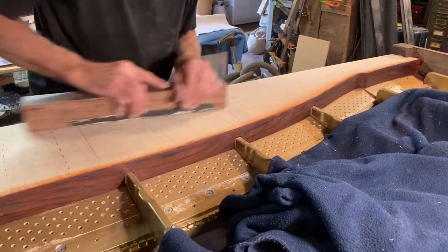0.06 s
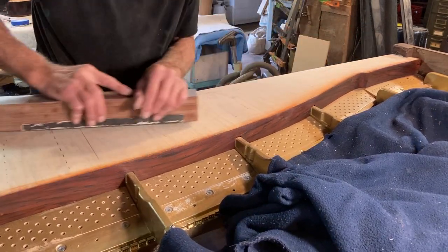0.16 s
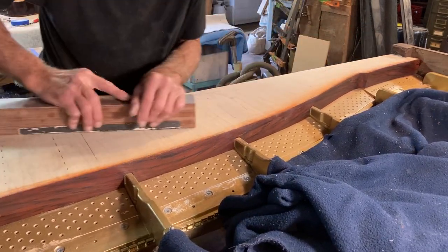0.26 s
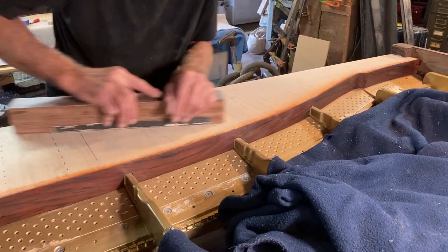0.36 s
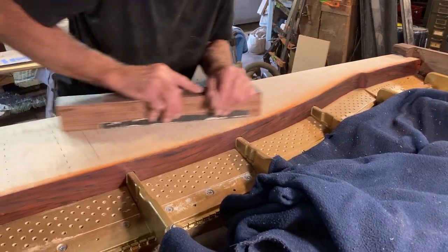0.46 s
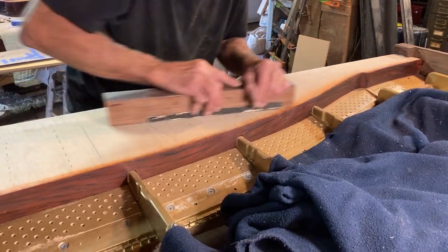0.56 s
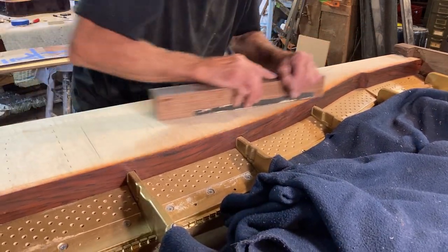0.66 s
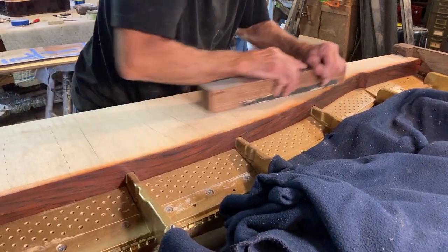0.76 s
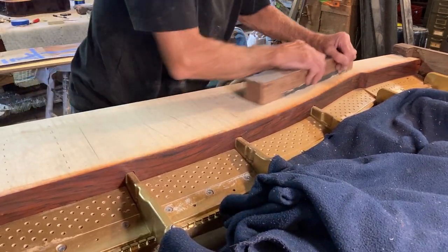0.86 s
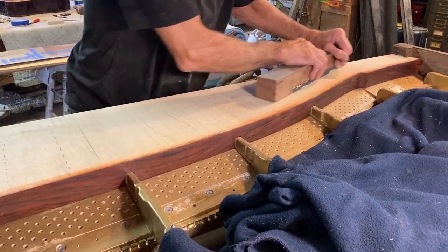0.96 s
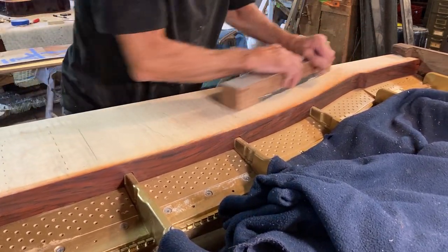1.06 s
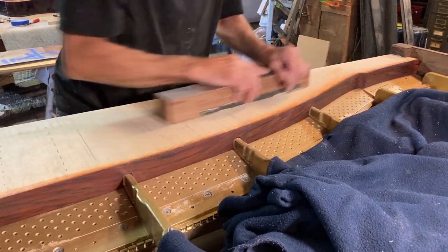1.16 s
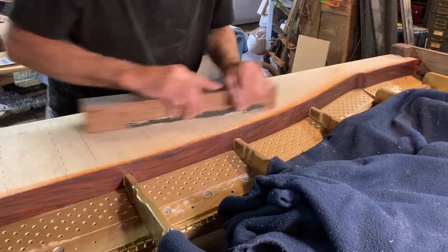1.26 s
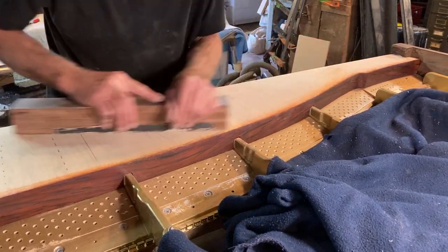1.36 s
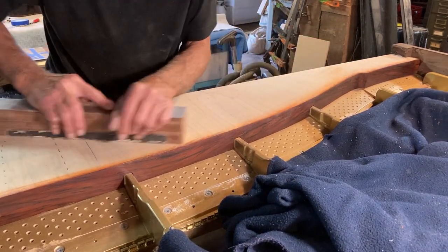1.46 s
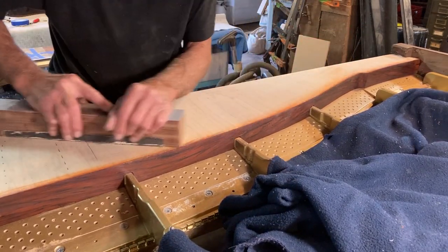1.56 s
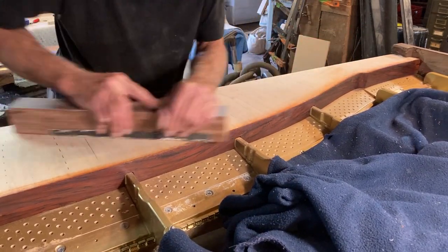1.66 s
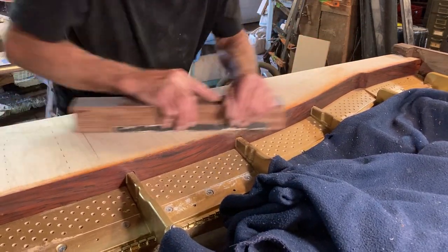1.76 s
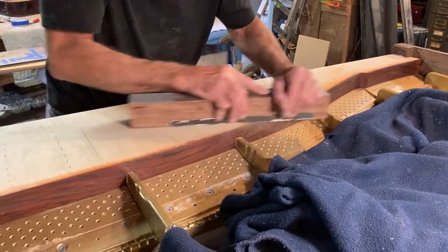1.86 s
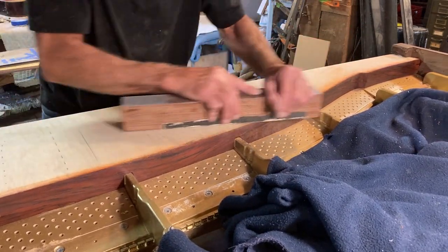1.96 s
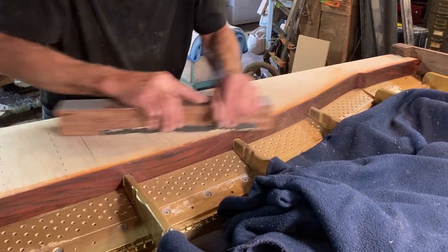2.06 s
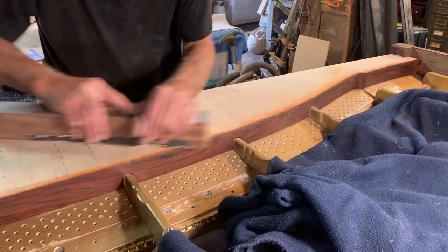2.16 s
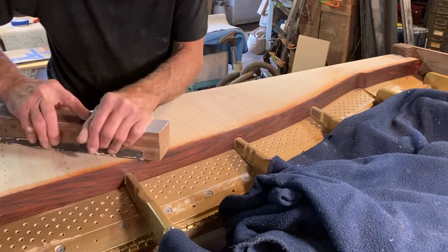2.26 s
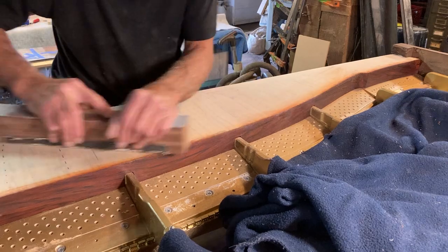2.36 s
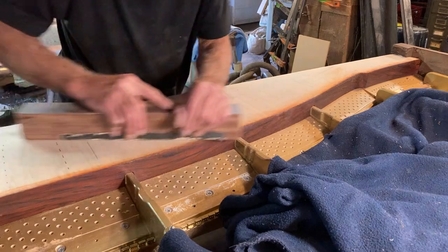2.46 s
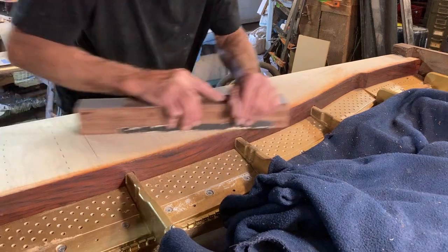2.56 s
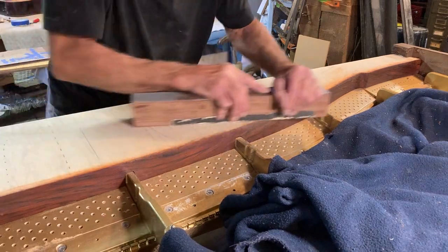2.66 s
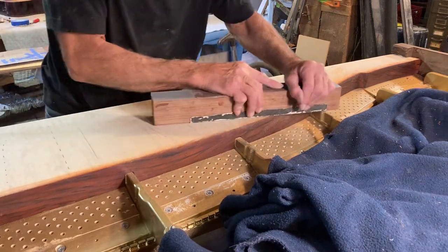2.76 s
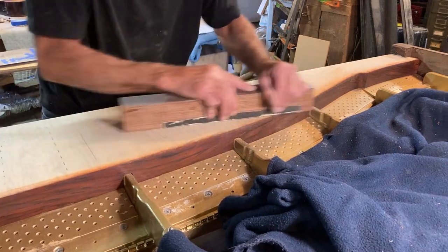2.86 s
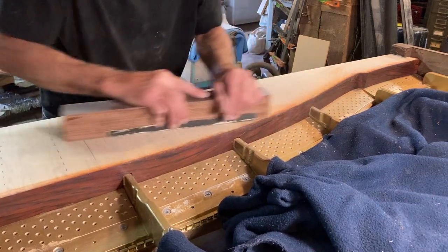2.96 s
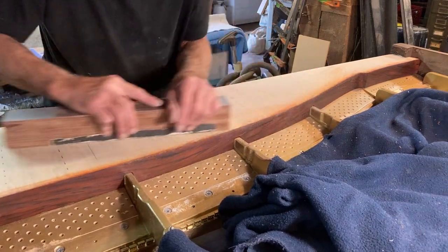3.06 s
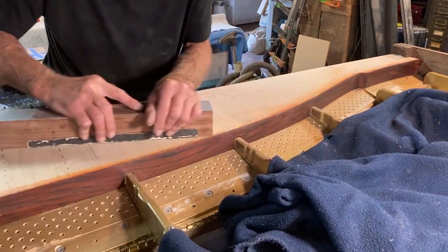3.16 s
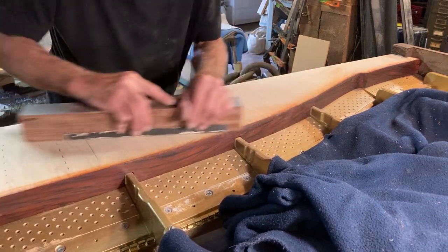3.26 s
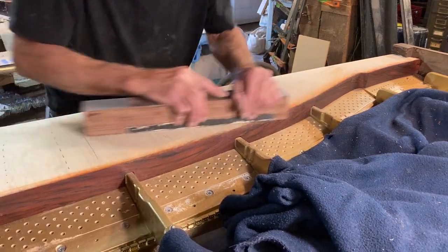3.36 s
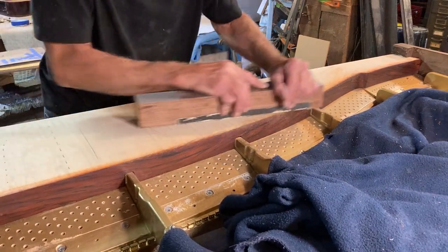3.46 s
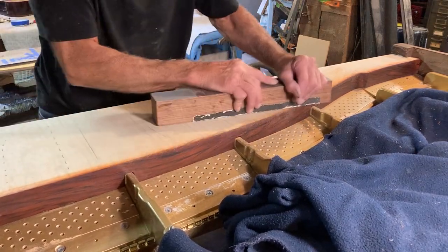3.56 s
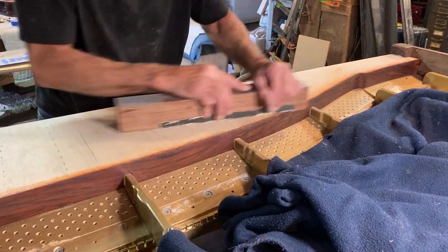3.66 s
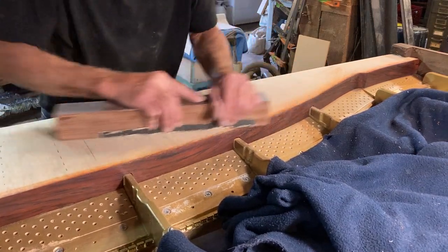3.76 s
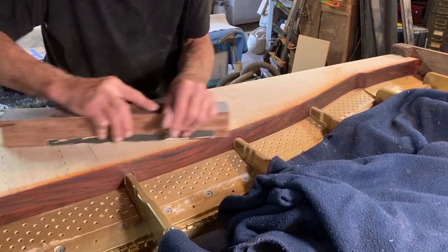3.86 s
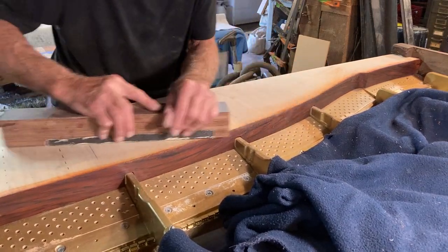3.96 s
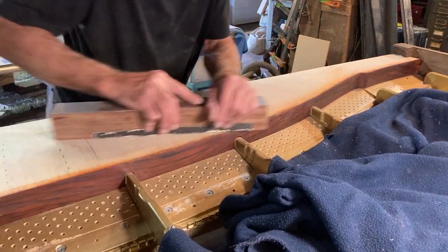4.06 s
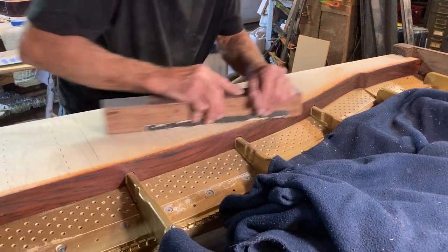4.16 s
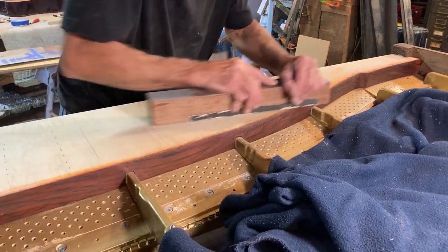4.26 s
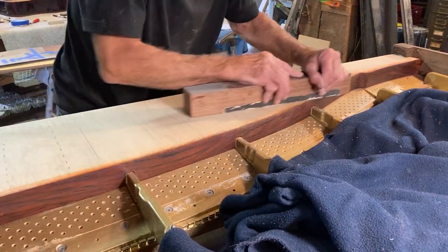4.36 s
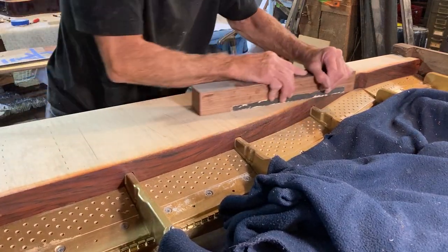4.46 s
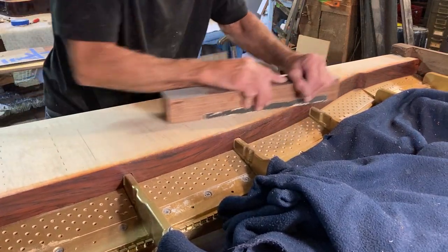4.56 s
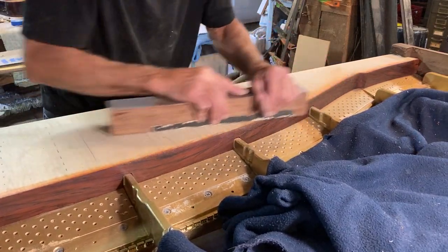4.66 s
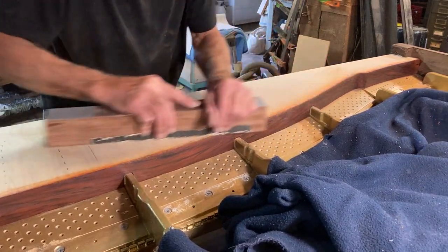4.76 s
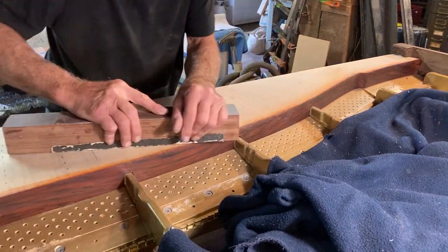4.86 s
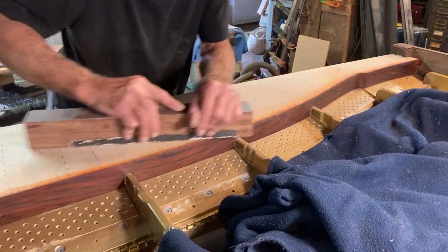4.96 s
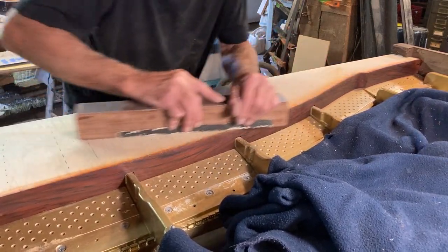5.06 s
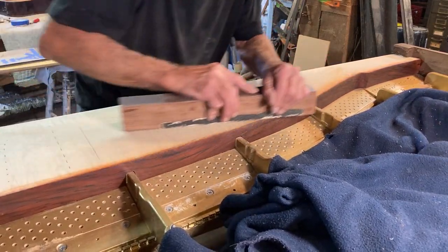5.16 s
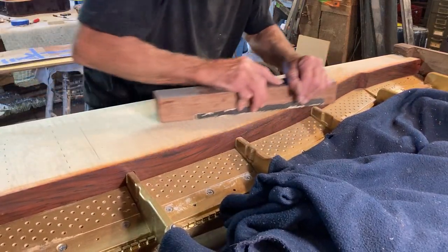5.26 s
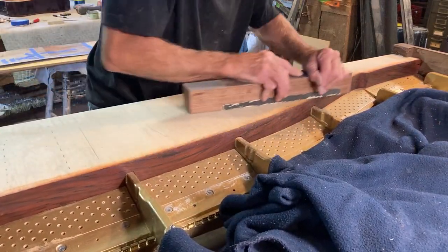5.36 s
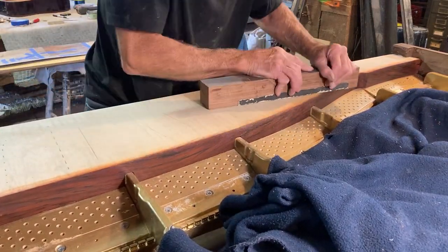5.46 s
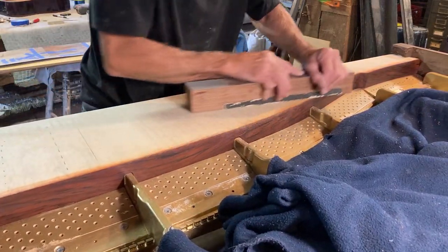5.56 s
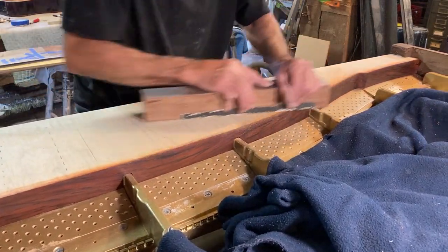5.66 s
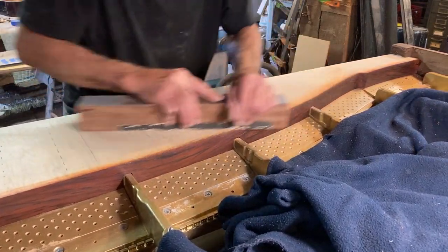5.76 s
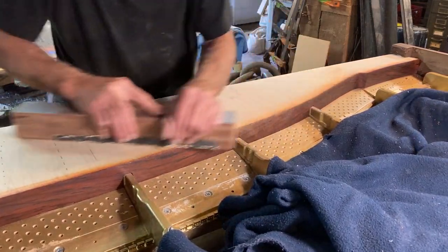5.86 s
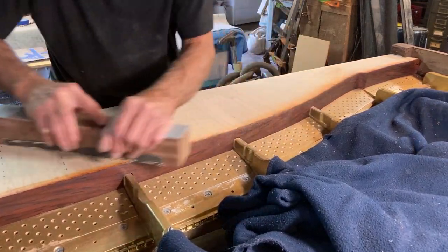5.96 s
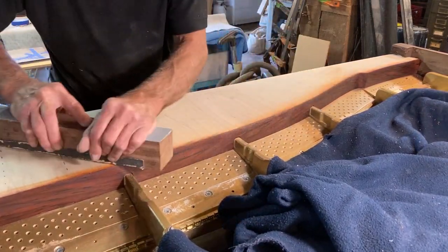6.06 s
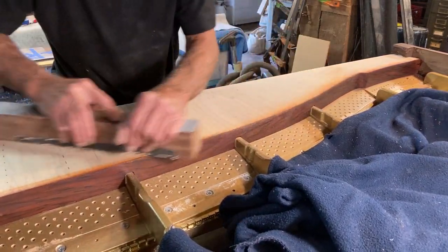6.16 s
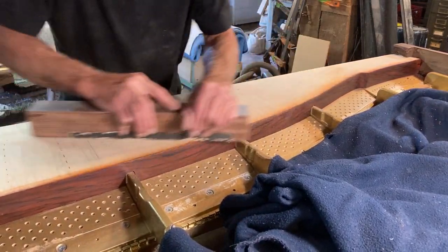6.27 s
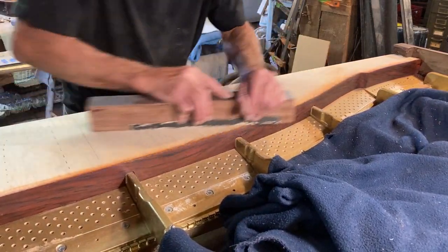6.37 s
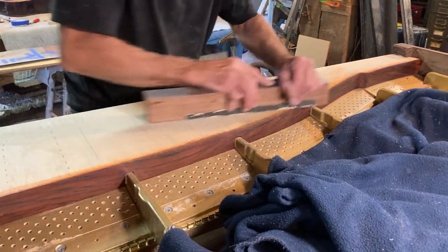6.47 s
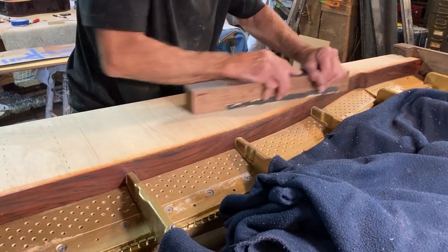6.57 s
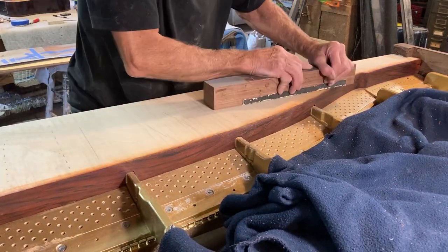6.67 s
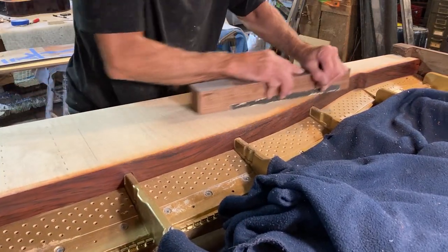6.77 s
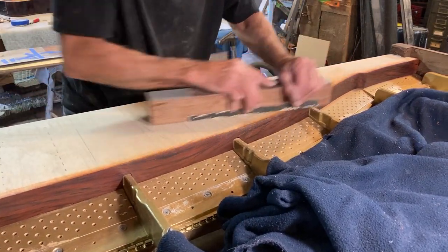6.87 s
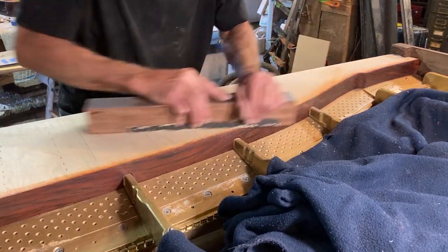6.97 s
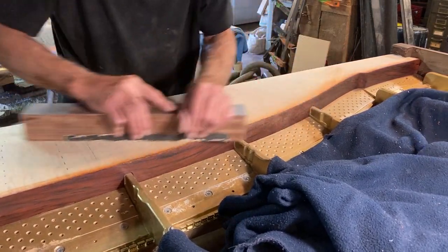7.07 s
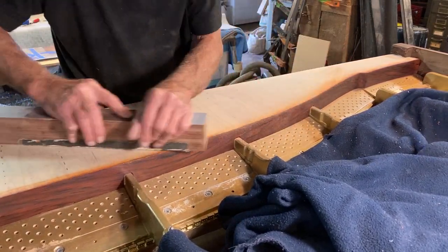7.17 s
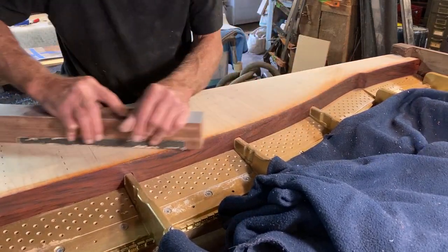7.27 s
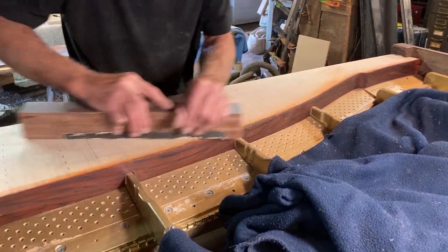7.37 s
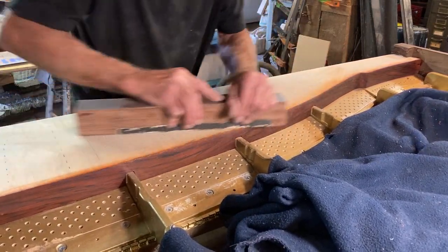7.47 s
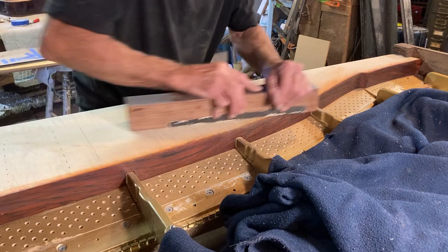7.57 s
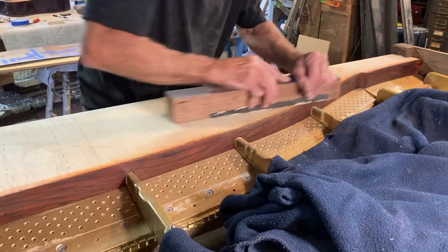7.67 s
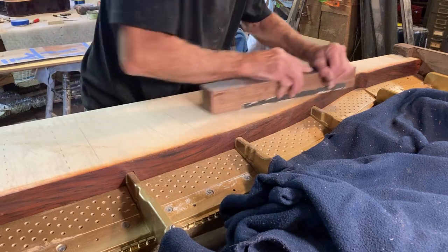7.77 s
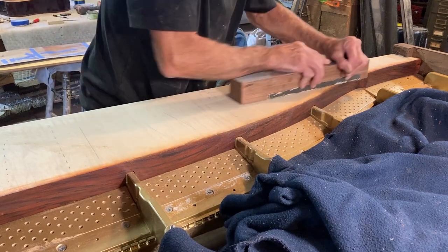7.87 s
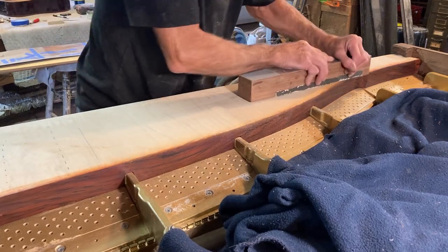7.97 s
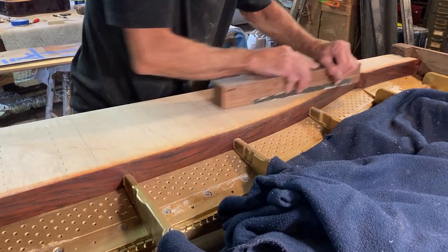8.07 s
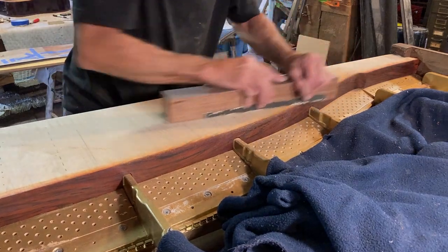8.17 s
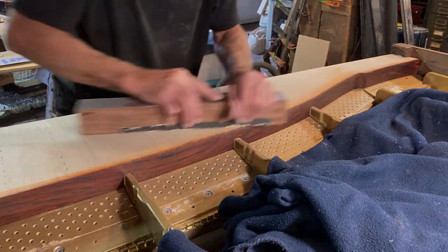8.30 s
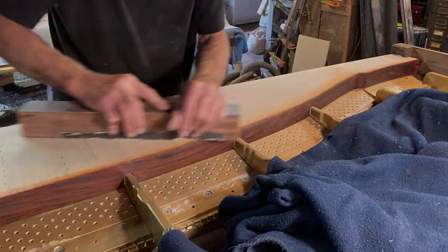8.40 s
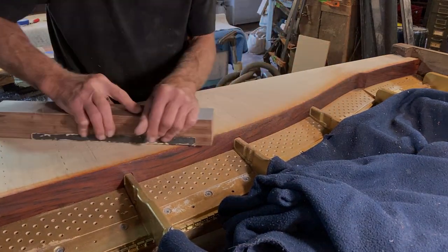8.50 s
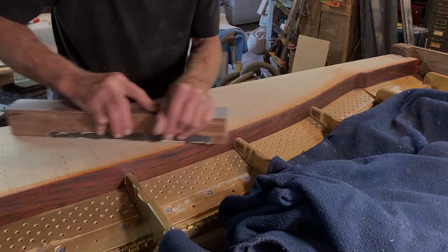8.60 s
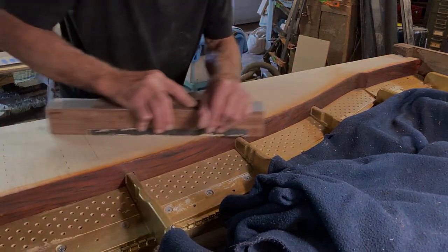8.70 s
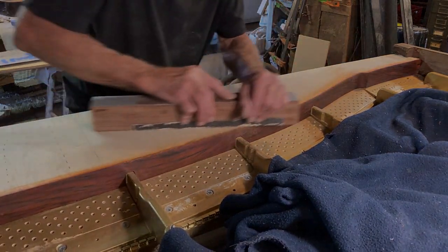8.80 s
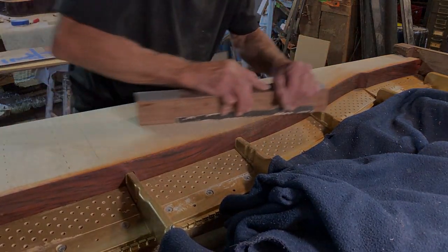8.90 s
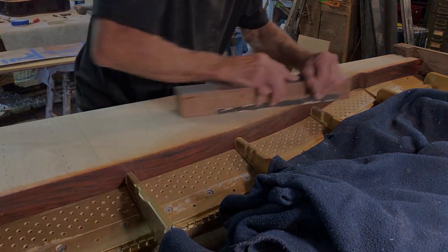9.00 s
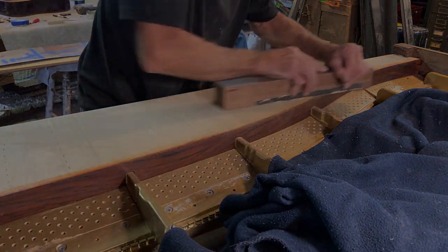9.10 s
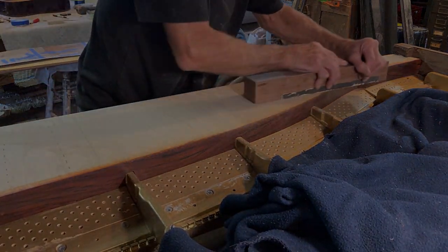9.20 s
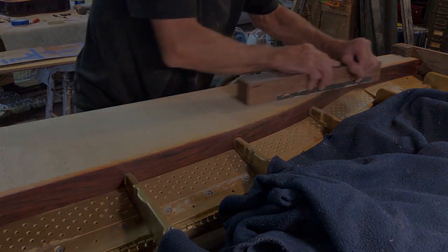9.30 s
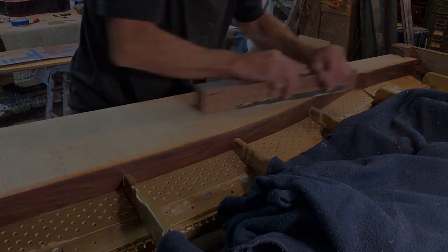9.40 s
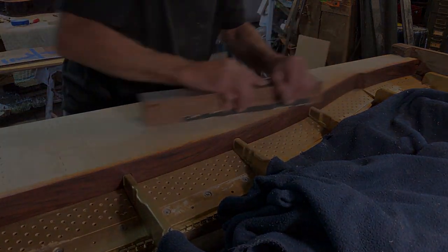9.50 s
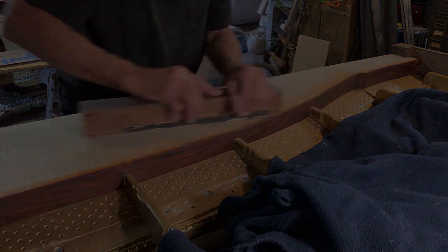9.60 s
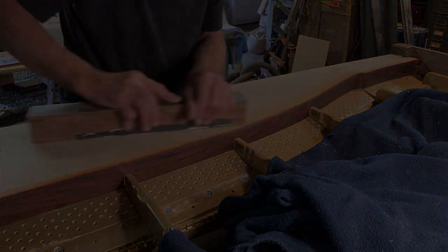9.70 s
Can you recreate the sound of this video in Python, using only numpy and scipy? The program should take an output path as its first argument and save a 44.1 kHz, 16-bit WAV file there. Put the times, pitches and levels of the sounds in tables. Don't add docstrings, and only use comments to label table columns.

```python
import sys
import numpy as np
from scipy import signal
from scipy.fft import rfft, irfft, next_fast_len
from scipy.io import wavfile
from scipy.ndimage import uniform_filter1d, map_coordinates

SR = 44100
rng = np.random.default_rng(int(sys.argv[2]) if len(sys.argv) > 2 else 0)


def pcm_store(signal):
    levels = np.round(np.clip(np.atleast_2d(signal), -1, 1) * 32767)
    wavfile.write(sys.argv[1], SR, levels.astype(np.int16).T)


def convert_level_to_amplitude(level_db):
    exponent = np.asarray(level_db, float) / 20
    return 10 ** exponent


N = 429534
FRAME = 512

# start_s, place_rad (leftward, as port phase), rasp_db, drift_db (per stroke), weight_db
STROKES = [(-.4, -4, -26.5, 6, -5), (0.114, 3.5, -80, 2, -27), (0.224, 5, -28, 3.5, 2.5),
           (.942, -1, -23, -1, 0.5), (1.527, 5.5, -27.5, 1, .1), (1.928, 2, -24, 2, -4.5),
           (2.329, 5.5, -28, -3.5, -1.5), (2.791, 0.5, -26, 3, -4), (3.188, 5, -28, -3.5, -1.5),
           (3.582, 1.2, -25, 1.5, -2.5), (3.953, 5, -29, -3, .1), (4.475, -.5, -24.5, 0, -3.5),
           (4.92, 4, -31.5, -7, 2), (5.514, 0.3, -23, -1.5, 1), (6.102, 5, -26.5, -6, 0),
           (6.712, -0.06, -24, 0, -0.5), (7.258, 5, -29, -5.5, 0.5), (7.985, -0.4, -24.5, -2.5, -1),
           (8.54, 4, -31, 2.5, -0.5), (9.276, -1.5, -29.5, -18, 1.5), (9.95, 6, -26, 0, 0)]
# turn_s, rasp_db, halt_s (before the turn)
ODD_TURNS = [(.112, -60, 0), (.222, -76, 0), (.942, -51, 0.001), (2.331, -49, 0.0047), (2.793, -58, 0.0068),
             (4.475, -62, 0.0037), (6.1, -67, 0.016), (6.714, -61, 0.011), (8.54, -45, 0.0014),
             (9.264, -61, 0.015)]
# speed_up_s, speed_up_share, slow_down_s, slow_down_share (of stroke), loudness_power (of speed)
PUSH = (0.093, 0.093, 0.067, 0.075, 1.84)
PULL = (0.038, 0.31, 0.037, 0.31, 1.6)
# freq_hz, density_db_per_hz
GRIT = [(300, -42), (600, -18), (900, -18), (1500, -8.5), (2200, -3), (3100, -4.5), (4500, 0), (5800, -1),
        (7300, -2), (10000, -7), (13000, -17), (14800, -21.5), (15800, -31)]
# freq_hz, width_hz, gain_db
DECK = [(674, 22, 9.5), (809, 25, 7.5), (951, 73, 9), (1187, 89, 9), (1410, 30, 2.5)]
# freq_hz, width_hz, level_db
HULL = [(83, 3.4, -11.5), (142.4, 14, -3.5), (157.9, 4.7, -5), (201.4, 8, -6.5), (235.4, 7.5, 1),
        (279, 8.8, -4.5), (303.5, 29, -4), (369.4, 9.1, -7), (415, 22, -7), (453.4, 6, -3),
        (485.7, 20.5, -6), (555, 19, -14.5)]
# level_db, follow_db_per_db (of rasp), push_gain_db, place_db_per_rad,
# growth_db (per stroke), weight_db_per_db, linger_s
SHAKE_RULES = [
    (-43.5, 0.33, 0.5, -1, 4, 0.33, 0.043),
    (-45.5, 0.72, 6.5, .5, 4, 1.45, 0.075),
    (-45.5, 0.62, 5.5, -0.36, 5, 1.3, 0.03),
]
# start_s, thud_db, crack_db, ring_length_share, bass_db_per_octave
KNOCKS = [
    (.205, -17, -50, 0.76, 3),
    (0.272, -31, -50, 0.24, 16.5),
    (2.264, -7, -11, 1, 1),
]
# freq_hz, level_db, t60_s, swell_s
RING = [(86, -19, 0.76, 0.02), (143.4, -3, 0.69, 0.025), (196, -4.5, 0.43, 0.009), (273, 0, 0.59, 0.038),
        (159.4, -1, 0.47, 0.023), (217.4, 0, 0.35, 0.026), (352, 4, 0.29, 0.026), (428, 7, 0.21, 0.0014),
        (508, -1.5, 0.25, .01), (671, -1, 0.14, 0.0037), (773, -2, 0.15, 0.0015),
        (860, -32.5, 0.05, 0.0028), (1136, -9, 0.14, 0.0024), (1340, -27, 0.12, .004)]
# freq_hz, density_db_per_hz
CRACK = [(300, -18), (1000, -8), (2500, -1.5), (4000, 1.5), (5500, -12), (8000, -7), (14000, -29)]
# start_s, end_s, freq_hz, width_hz, level_db
SQUEAK = (0.7, 0.83, 1190, 25, -43)
# freq_hz, density_db_per_hz
SHOP = [(25, -40), (45, -18), (160, 50), (700, -9), (4000, -92), (10000, -88), (16000, -59)]
# freq_hz, lead_rad
STILL = [(100, -.12), (550, -.45), (780, .7), (1300, .1), (3000, 1.4), (3900, .1), (5300, 0), (5900, 1)]
# freq_hz, lead_rad_per_place_rad
SWING = [(600, 0), (1200, .15), (2000, .35), (3000, .4), (3900, 1), (5300, 1), (6000, .8)]
# freq_hz, lead_rad
BEND = [(1500, 0), (2500, .5), (3000, .7), (3400, -.4), (4000, -.7), (5300, -.5)]
# freq_hz, lead_rad
TREBLE = [(5000, 2.8), (7000, 0), (9200, -3.14), (11350, -6.28), (13700, -9.42), (15500, -12.57)]
# freq_hz, coherence_0_to_1
ALIKE = [(100, 0.99), (300, 0.97), (550, 0.49), (750, 0.17), (1500, 0.41), (2200, 0.68), (2900, 0.71),
         (3400, 0.44), (4700, 0.65), (6000, 0.59), (7000, 0.96), (8000, 1), (9200, 1), (10300, 0.69),
         (11350, 0.9), (13700, 1), (14700, 0.87), (15300, .98)]
# freq_hz, difference_db
LEAN = [(300, 0.3), (800, 0.5), (1500, 2.5), (2900, 2.8), (3400, 2.5), (5000, 0), (5800, -2), (7000, 0)]


def unit(x):
    return x / np.sqrt(np.mean(np.abs(x) ** 2) + 1e-20)


def along(points, hz):
    f, v = np.transpose(points)
    return np.interp(np.log(hz + 1), np.log(f + 1), v)


def wobble(rate_hz):
    knots = rng.standard_normal(int(N * rate_hz / SR) + 4)
    return map_coordinates(knots, [np.arange(N) * rate_hz / SR])


def filtered(x, response):
    m = next_fast_len(N + SR // 2)
    return irfft(rfft(x, m) * response(np.fft.rfftfreq(m, 1 / SR)), m)[..., :N]


def hand(t):
    start_s, place_rad, rasp_db, drift_db, weight_db = np.transpose(STROKES)
    turn_db = np.full(len(start_s), -65.5)
    halt_s = np.zeros(len(start_s))
    for when_s, odd_db, odd_halt_s in ODD_TURNS:
        nearest = np.argmin(np.abs(start_s - when_s))
        turn_db[nearest] = odd_db
        halt_s[nearest] = odd_halt_s
    k = np.clip(np.searchsorted(start_s, t) - 1, 0, len(start_s) - 2)
    length_s = start_s[k + 1] - start_s[k]
    since_s = t - start_s[k]
    progress = since_s / length_s
    push = place_rad[k + 1] < place_rad[k]
    up_s, up, down_s, down, power = np.where(push, np.array(PUSH)[:, None], np.array(PULL)[:, None])

    def ramp(x):
        return np.sin(np.pi / 2 * np.clip(x, 0, 1))

    speed_up = ramp(since_s / (up_s + up * length_s))
    slow_down = ramp((length_s - halt_s[k + 1] - since_s) / (down_s + down * length_s))
    speed = speed_up * slow_down
    creep = convert_level_to_amplitude(turn_db[k] + (turn_db[k + 1] - turn_db[k]) * (progress > 0.5))
    level = convert_level_to_amplitude(rasp_db[k] + drift_db[k] * (progress - 0.5)) * speed ** power + creep * (1 - speed)
    travel = (1 - np.cos(np.pi * progress)) / 2
    place = place_rad[k] + (place_rad[k + 1] - place_rad[k]) * travel
    return 20 * np.log10(level), place, push, progress, weight_db[k]


def breakaway():
    t = np.arange(N) / SR
    starts_s = np.array(STROKES)[:, 0] + 0.026
    since_s = t - starts_s[np.maximum(np.searchsorted(starts_s, t) - 1, 0)]
    return convert_level_to_amplitude(1.8 * (since_s > 0) * np.exp(-np.abs(since_s) / 0.05))


def rasp():
    size_db = np.minimum(2 * rng.exponential(size=(2, N)), 5)
    tears = (rng.random((2, N)) < 0.4) * convert_level_to_amplitude(size_db) * rng.standard_normal((2, N))
    tears = unit(tears) * convert_level_to_amplitude(0.088 * wobble(60) + 0.09 * wobble(360))

    def grit_on_deck(f):
        peaks_db = sum(db / (1 + (2 * (f - c) / w) ** 2) for c, w, db in DECK)
        return convert_level_to_amplitude(along(GRIT, f) + peaks_db)

    hz, t, z = signal.stft(filtered(tears, grit_on_deck), SR, nperseg=FRAME)
    reference = z[:, (hz > 6500) & (hz < 8500)]
    z = z / np.sqrt(np.mean(np.abs(reference) ** 2) * 70)
    patches = uniform_filter1d(rng.standard_normal(z.shape[1:]), 7, 0)
    patches_db = 1.36 * unit(uniform_filter1d(patches, 12, 1))

    deck = np.clip(along([(1900, 0.85), (2900, 0.25), (3600, 0)], hz)[:, None], 0, 1)
    fine = along([(8000, 0.24), (11500, 0.96)], hz)[:, None]
    block = along([(2200, 0.2), (3600, 0.55), (5000, 0.53), (7000, 0)], hz)[:, None]

    rasp_db, place, _, _, weight_db = hand(t)
    effort_db = rasp_db + 28
    held_db = np.maximum(effort_db, -10)
    offset = place - 2.5
    deck_db = 11.5 - 44.5 + 0.4 * effort_db + 0.23 * weight_db
    fine_db = 10.0 - 6 + 0.4 * offset + 0.23 * held_db
    block_db = -2 + offset - 0.63 * held_db
    level = convert_level_to_amplitude(rasp_db * (1 - deck) + deck_db * deck)
    colour = convert_level_to_amplitude(fine_db * fine + block_db * block)
    sound = signal.istft(z * level * colour * convert_level_to_amplitude(patches_db), SR, nperseg=FRAME)[1][:, :N]
    return breakaway() * sound


def hull():
    t = np.arange(N) / SR
    groups = np.zeros((4, 2, N))
    for hz, width_hz, db in HULL:
        shake = convert_level_to_amplitude(db + 3.5 * wobble(5)) * rng.standard_normal((2, N))
        radius = np.exp(-np.pi * width_hz / SR)
        poles = [1, -2 * radius * np.cos(2 * np.pi * hz / SR), radius ** 2]
        group = np.searchsorted([100, 215, 330], hz)
        groups[group] += signal.lfilter([1 - radius, 0, radius - 1], poles, shake)
    cavity_db = [(30, -22), (50, 4), (75, -6), (90, -8), (110, -20)]
    modes_db = [(60, -32), (105, -12), (135, -3.5), (560, -5.5), (750, -5.0)]
    cavity = filtered(groups[0], lambda f: convert_level_to_amplitude(along(cavity_db, f)))
    modes = filtered(groups[1:], lambda f: convert_level_to_amplitude(along(modes_db, f)))

    rasp_db, place, push, progress, weight_db = hand(t)
    levels = []
    for db, follows, push_db, place_db, growth_db, heavy, linger_s in SHAKE_RULES:
        drive_db = db + follows * (rasp_db + 28.5) + push_db * (push - 0.5) + place_db * (place - 3.0)
        drive_db = drive_db + growth_db * (progress - 0.5) + heavy * weight_db + 1.3 * wobble(4)
        power = convert_level_to_amplitude(drive_db) ** 2
        keep = np.exp(-1 / (linger_s * SR))
        lingering = signal.lfilter([1 - keep], [1, -keep], power, zi=[power[0]])[0]
        levels.append(np.sqrt(lingering))
    cavity = convert_level_to_amplitude(-37.5) * np.sqrt(levels[0]) * unit(cavity)
    return cavity + sum(level * unit(group) for level, group in zip(levels, modes))


def knocks():
    thuds = np.zeros((2, N + SR))
    cracks, rattles = np.zeros((2, 2, N + SR))
    t = np.arange(SR * 3 // 4) / SR
    for start_s, thud_db, crack_db, length, bass_db in KNOCKS:
        span = slice(round(start_s * SR), round(start_s * SR) + len(t))
        ring = np.zeros((2, len(t)))
        softness_s = 0.0002 * abs(thud_db - crack_db)
        for hz, db, t60_s, swell_s in RING:
            decay_db = -60 * t / (t60_s * length)
            level_db = db + bass_db * np.log2(400 / hz) + decay_db + 3.5 * wobble(41.2)[:len(t)]
            swell = 1 - np.exp(-t / (swell_s * length + softness_s))
            ring += convert_level_to_amplitude(level_db) * swell * np.sin(2 * np.pi * (hz * t + rng.random((2, 1))))
        thuds[:, span] += convert_level_to_amplitude(thud_db - 11.0) * ring * [[1], [0.3]]
        burst = 0.54 * convert_level_to_amplitude(-60 * t / 0.0099) + convert_level_to_amplitude(-60 * t / 0.047) + 0.093 * convert_level_to_amplitude(-60 * t / 0.18)
        cracks[:, span] += convert_level_to_amplitude(crack_db) * burst * rng.standard_normal((2, len(t)))
        rattle_db = (crack_db + thud_db) / 2 - 2.5 - 60 * t / (0.25 * length)
        rattles[:, span] += convert_level_to_amplitude(rattle_db) * rng.standard_normal((2, len(t)))
    crack = 1.84 * filtered(cracks[:, :N], lambda f: convert_level_to_amplitude(along(CRACK, f)))
    wood = signal.butter(2, [300, 1500], "band", fs=SR, output="sos")
    return thuds[:, :N] + crack + signal.sosfilt(wood, rattles[:, :N])


def squeak():
    start_s, end_s, hz, width_hz, db = SQUEAK
    progress = np.clip((np.arange(N) / SR - start_s) / (end_s - start_s), 0, 1)
    noise = rng.standard_normal((2, N))
    tone = filtered(noise, lambda f: 1 / (1 + (2 * (f - hz) / width_hz) ** 2))
    return convert_level_to_amplitude(db) * np.sin(np.pi * progress) * unit(tone)


def shop():
    return convert_level_to_amplitude(-59.5) * unit(filtered(rng.standard_normal((2, N)), lambda f: convert_level_to_amplitude(along(SHOP, f))))


def ports(pair, place_at):
    hz, t, (direct, scattered) = signal.stft(pair, SR, nperseg=FRAME)
    place = place_at(t)
    moving_rad = along(STILL, hz)[:, None] + along(SWING, hz)[:, None] * place
    moving_rad = moving_rad + along(BEND, hz)[:, None] * np.sin(np.pi * place / 5)
    steady_rad = np.interp(hz, *np.transpose(TREBLE))[:, None]
    share = np.clip((hz[:, None] - 5000) / 1700, 0, 1) ** 0.99
    slowness = along([(900, 0), (2000, 0.46)], hz)[:, None]
    brisk = np.clip((hand(t)[0] + 48) / 18, 0.2, 1) ** slowness
    alike = np.clip(along(ALIKE, hz), 0, 1)[:, None]
    link = alike * ((1 - share) * brisk * np.exp(-1j * moving_rad) + share * np.exp(-1j * steady_rad))
    right = link * direct + np.sqrt(np.clip(1 - np.abs(link) ** 2, 0, 1)) * scattered
    shade = [(3200, 0), (3900, 1.0), (4700, 0.18), (5200, 0), (6000, 1.0), (6800, 0.032)]  # hz, db_per_rad
    shade_db = along(shade, hz)[:, None] * (place - 2.5)
    lean = convert_level_to_amplitude((along(LEAN, hz)[:, None] + shade_db) / 2)
    return signal.istft(np.array([direct * lean, right / lean]), SR, nperseg=FRAME)[1][:, :N]


def scene():
    rubbing = ports(rasp() + hull() + squeak() + shop(), lambda t: hand(t)[1])
    bumps = ports(knocks(), lambda t: 1.6 + 0 * t)
    return rubbing + bumps


def roll_off(x):
    return signal.sosfilt(signal.butter(12, 17080, fs=SR, output="sos"), x)


def record(dry):
    mix = filtered(dry, lambda hz: hz < 15800)
    return roll_off(mix)


dry = scene()
out = record(dry)
pcm_store(out)
```